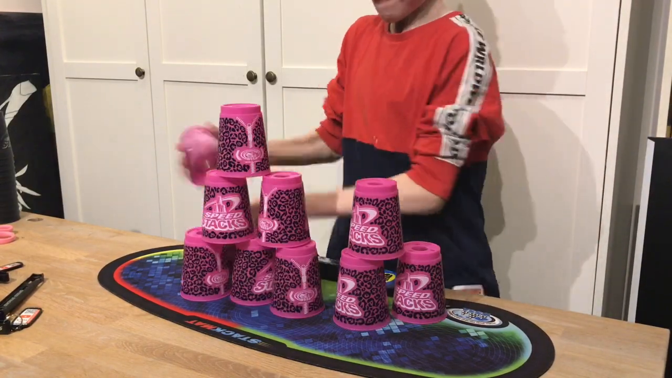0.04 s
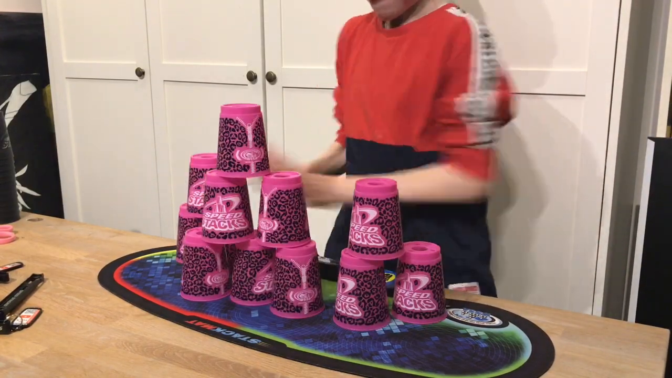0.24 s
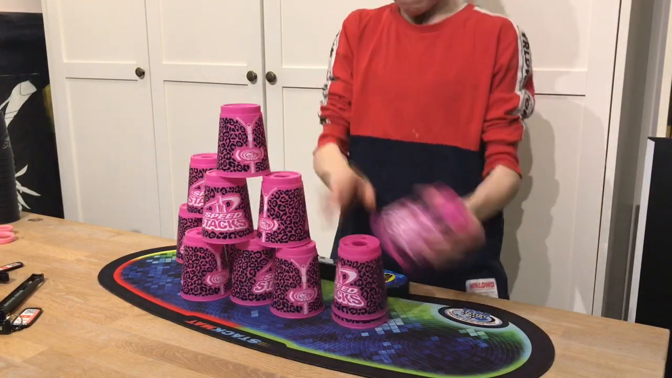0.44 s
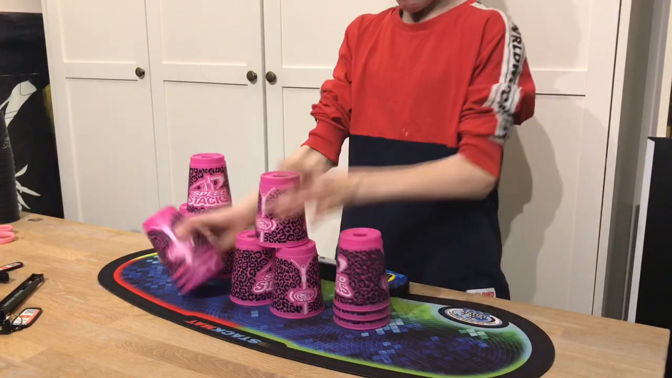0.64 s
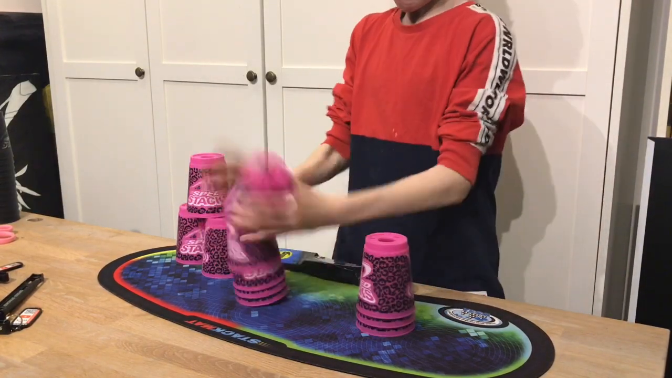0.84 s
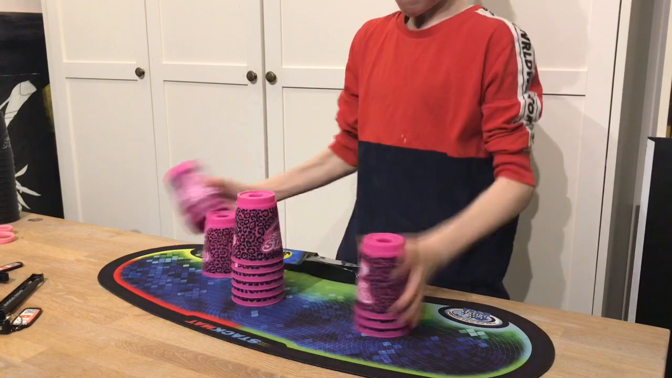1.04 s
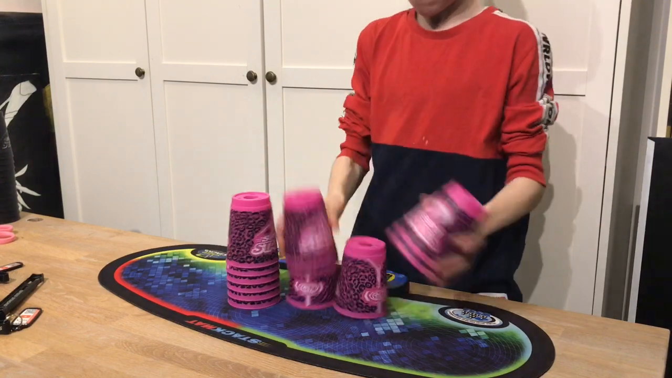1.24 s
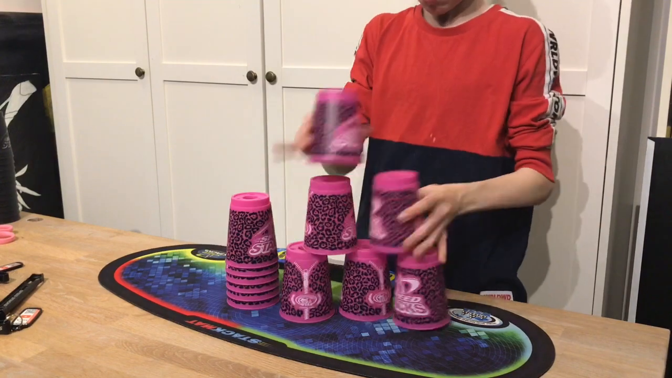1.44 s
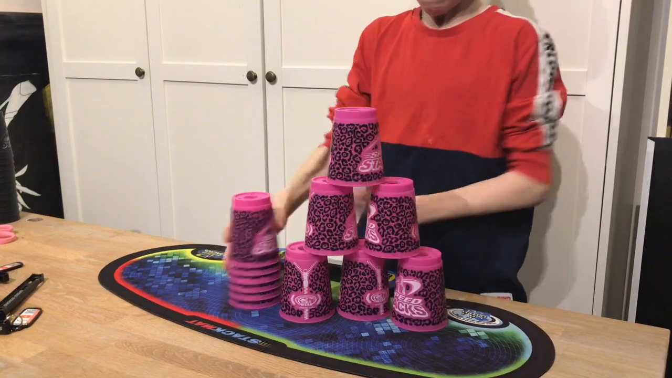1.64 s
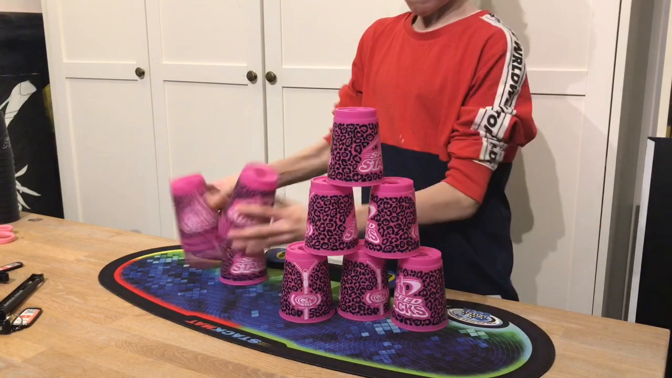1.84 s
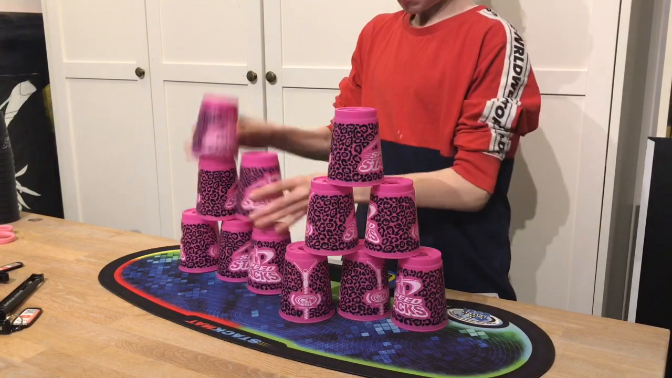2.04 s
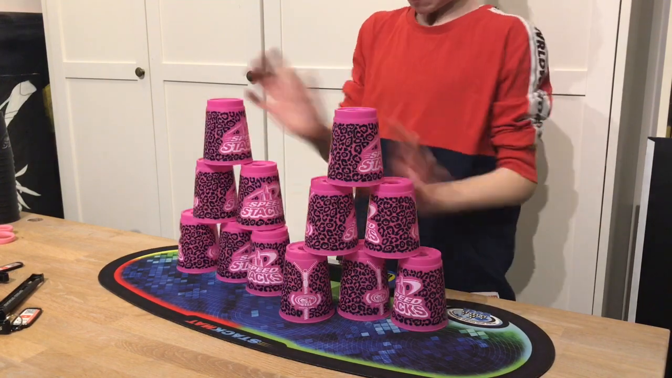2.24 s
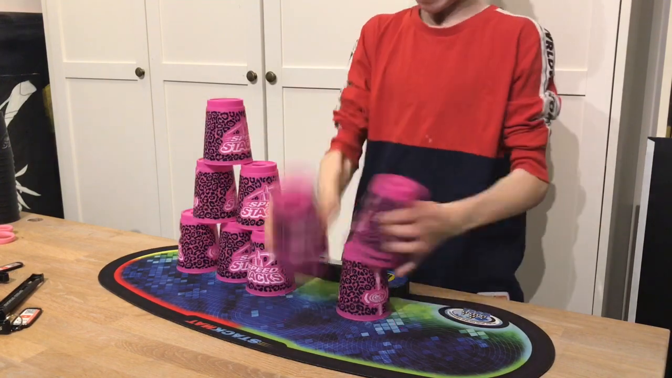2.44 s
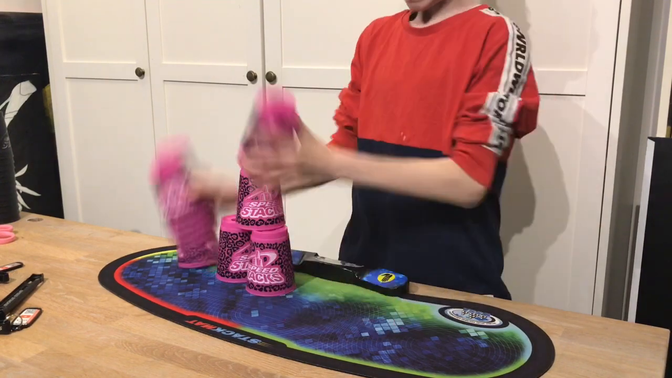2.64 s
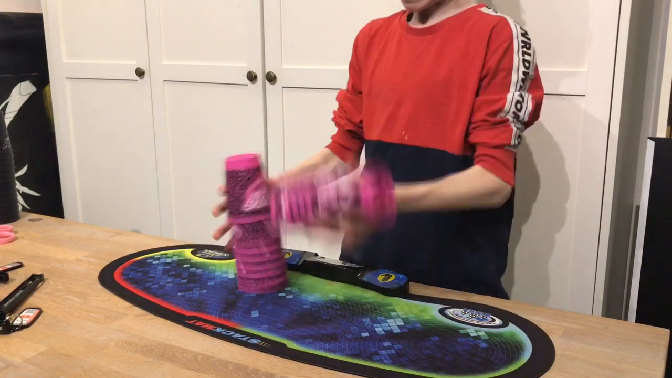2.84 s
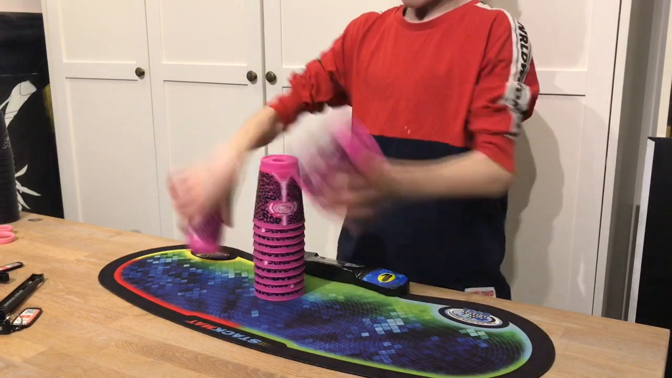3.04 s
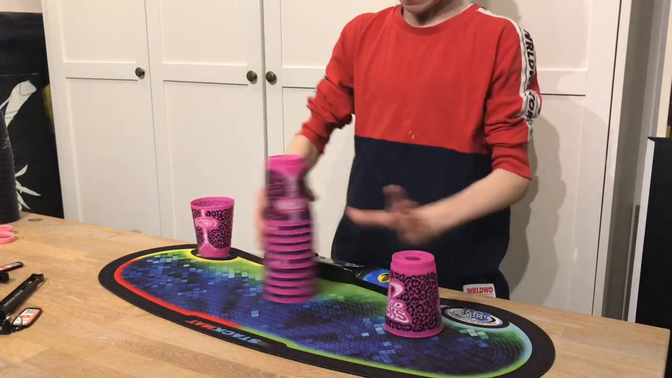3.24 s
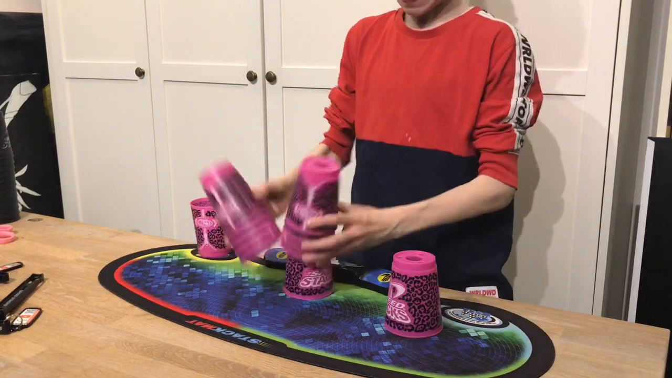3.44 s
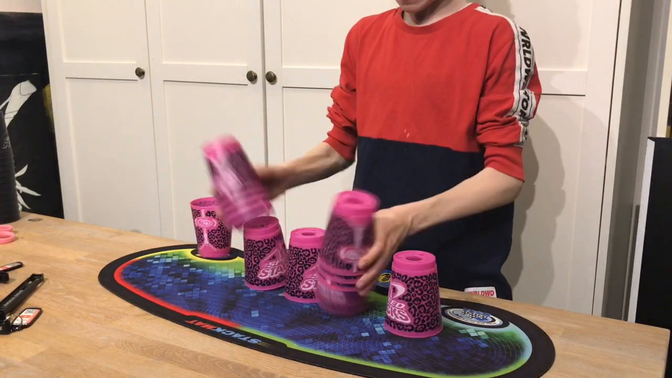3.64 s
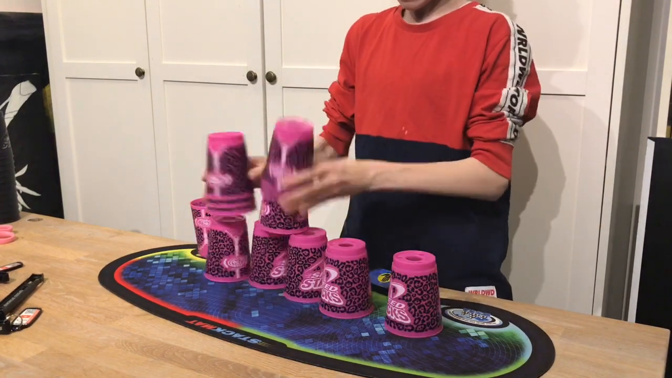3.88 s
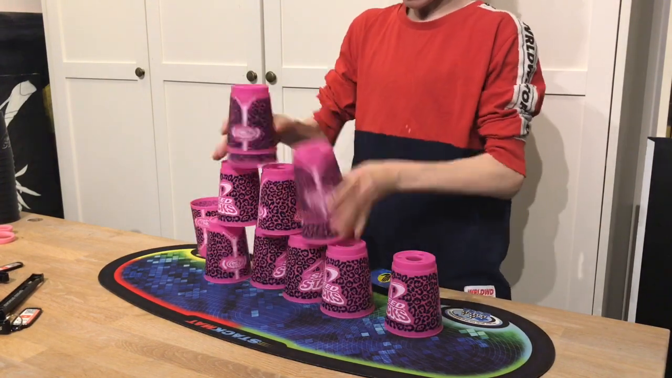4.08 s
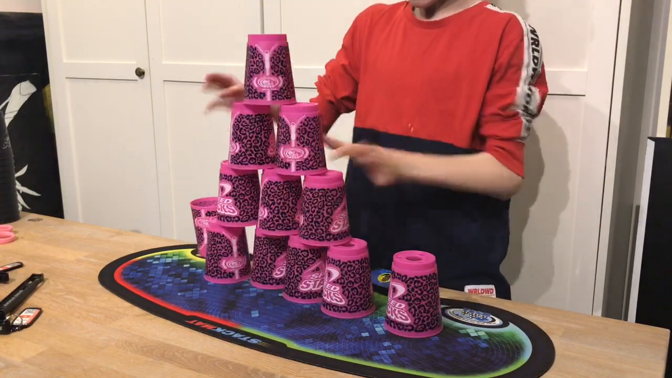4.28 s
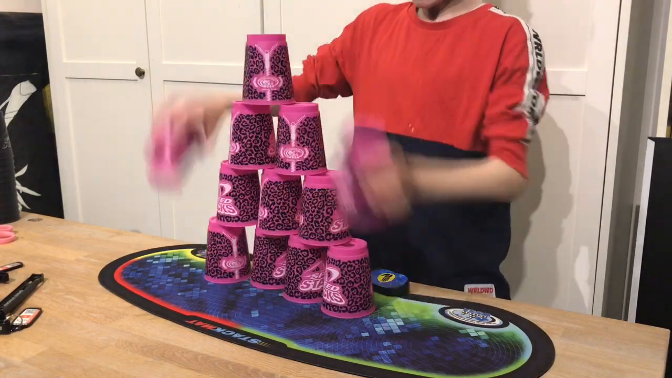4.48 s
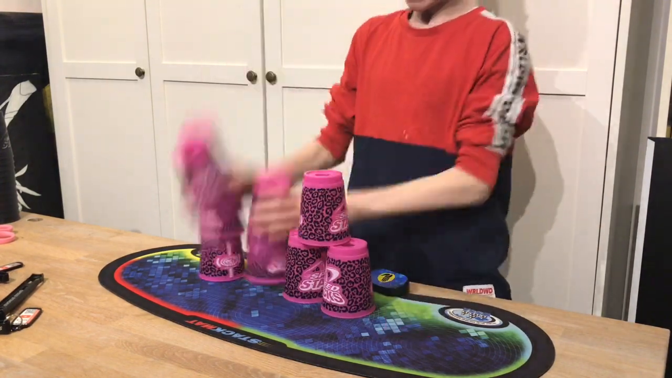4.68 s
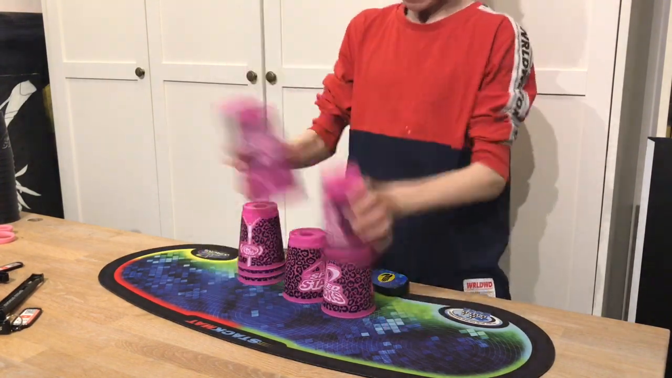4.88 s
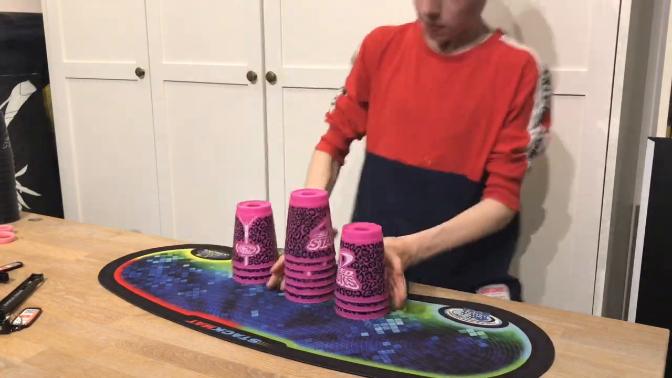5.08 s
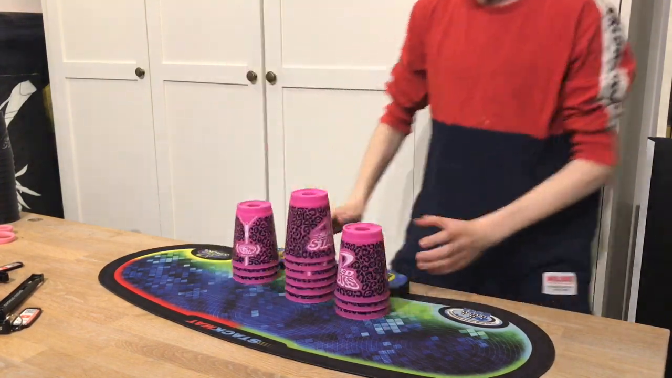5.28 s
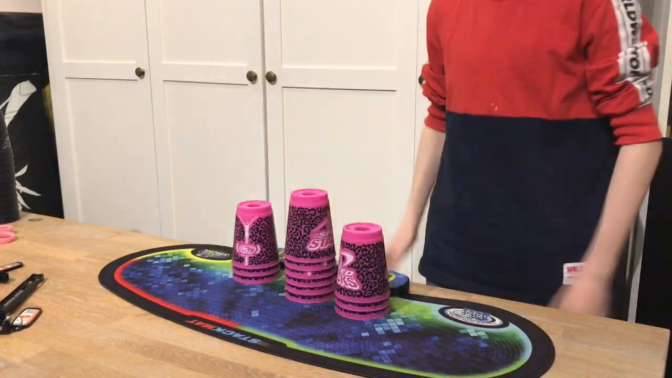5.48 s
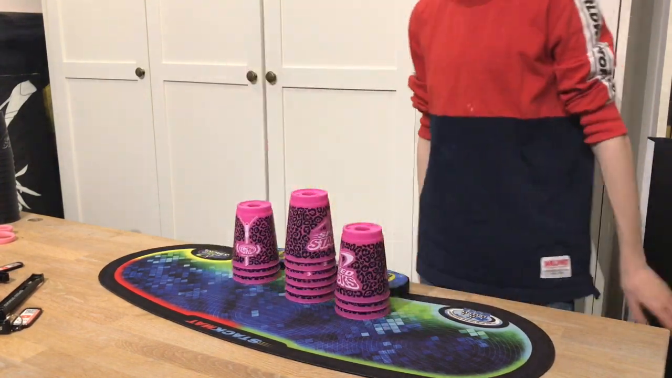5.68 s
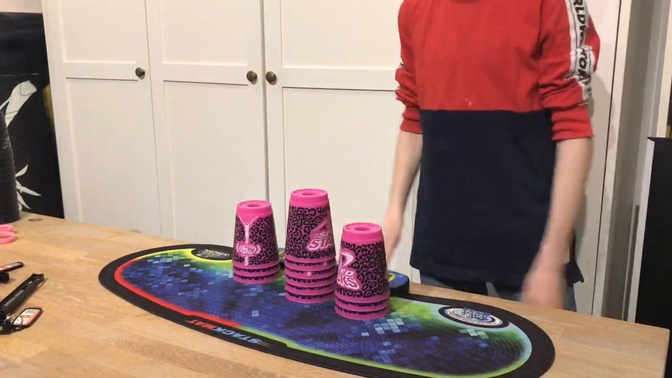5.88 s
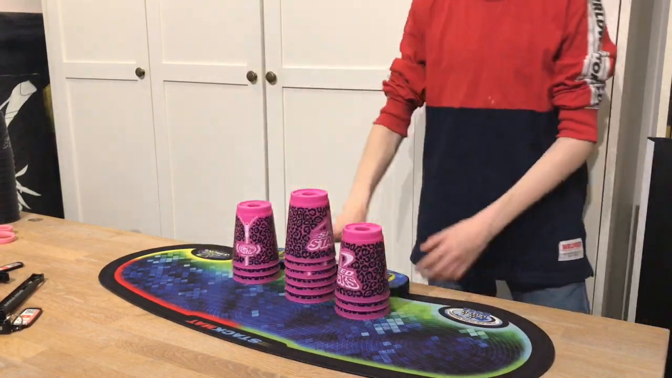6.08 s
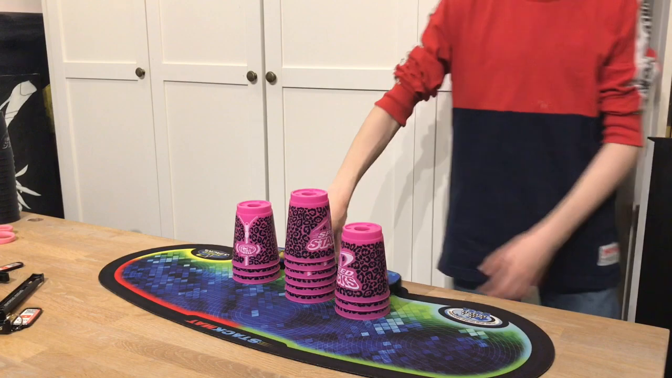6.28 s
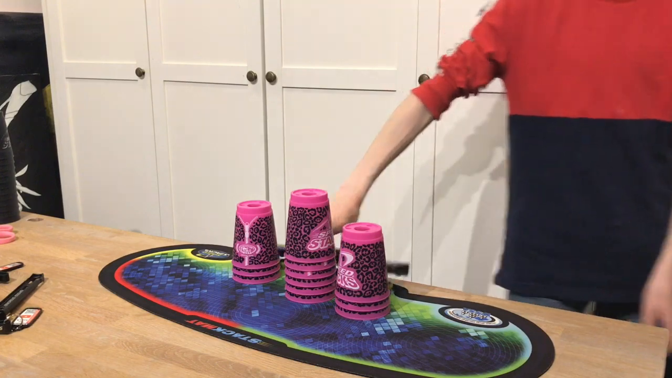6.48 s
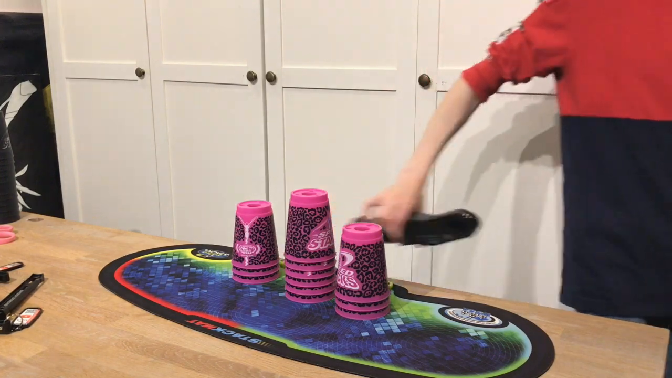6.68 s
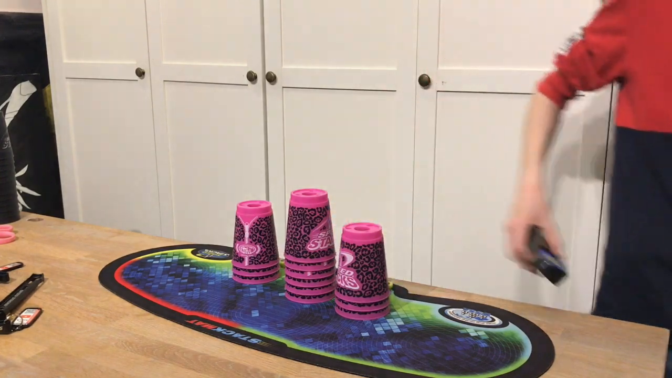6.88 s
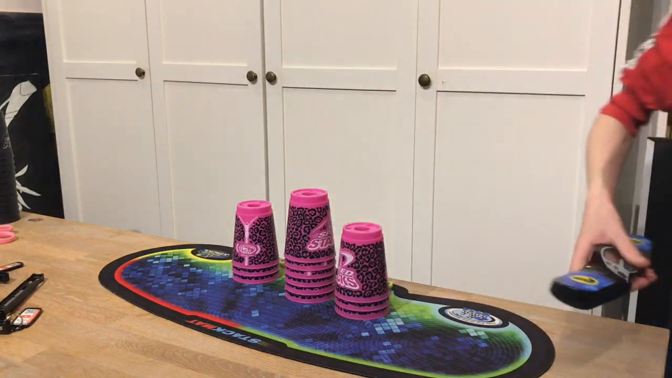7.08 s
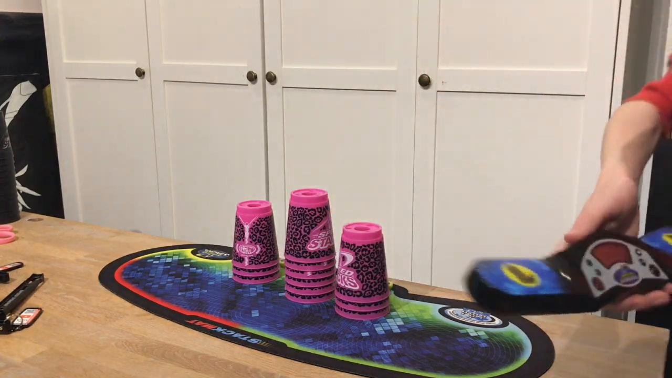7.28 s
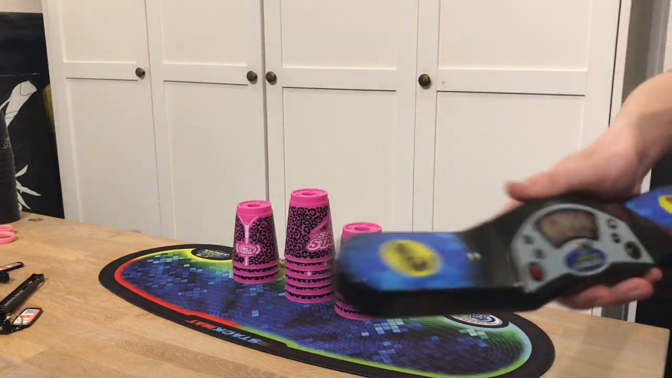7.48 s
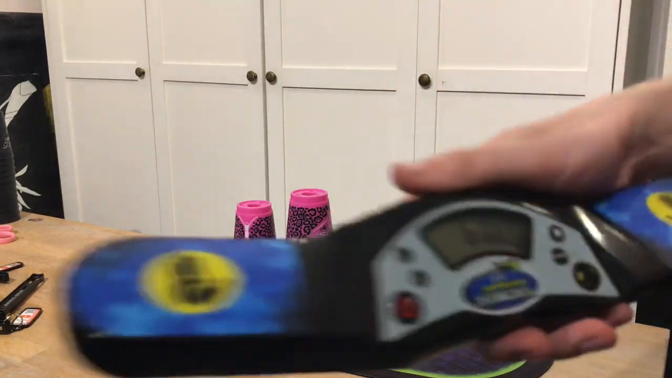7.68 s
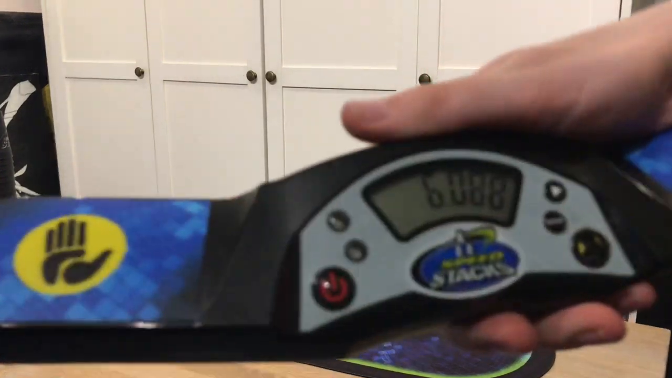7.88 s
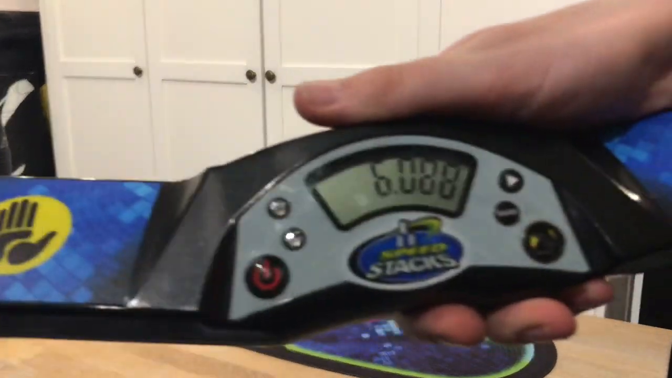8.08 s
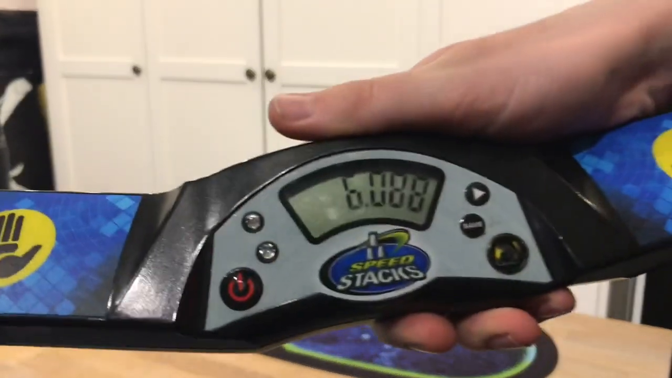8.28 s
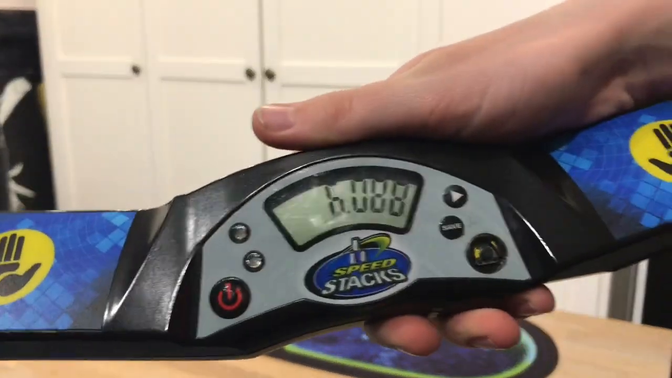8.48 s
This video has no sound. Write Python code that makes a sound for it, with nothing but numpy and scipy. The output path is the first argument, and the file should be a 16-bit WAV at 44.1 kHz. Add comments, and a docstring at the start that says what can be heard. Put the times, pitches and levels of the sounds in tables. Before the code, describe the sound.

Hollow plastic cups clatter in a frantic five-second run of pops, clicks and table thumps, then a small plastic box taps once sharply and quiet follows.

```python
"""Hollow plastic cups are stacked and unstacked fast on a thin mat over a wooden table, in a small room.
Rims crack as treble noise bursts, trapped air and cup walls ring as struck modes, the table thumps, and
nesting walls scrape as random stick-slip pulses. Then a small plastic box taps and scuffs as it is lifted
and handled, with soft steps; clothes rustle as swelling noise bands. Quiet room tone lies under it all."""
import sys
import numpy as np
from scipy import signal
from scipy.fft import rfft, irfft, next_fast_len
from scipy.io import wavfile

SR = 44100
rng = np.random.default_rng(int(sys.argv[2]) if len(sys.argv) > 2 else 0)


def unload_wav(signal):
    """Save mono or channel-first audio to the path in sys.argv[1] as 16-bit WAV at rate SR, clipped to [-1, 1]."""
    wavfile.write(
        sys.argv[1],
        SR,
        np.round(np.clip(np.atleast_2d(signal).T, -1, 1) * 32767).astype(np.int16),
    )


N = 375776

# Modes of the cup wall. Each row: frequency in Hz, relative level in dB, T60 in seconds.
CUP_MODES = [(658, -0.5, 0.064), (932, 0, 0.047), (1110.3, -4.5, 0.059), (1310, -7, 0.03),
             (1707, -10, 0.028), (2210, -10, 0.015), (3218, -9.5, 0.004)]
# Modes of the table. Each row: frequency in Hz, relative level in dB, T60 in seconds.
TABLE_MODES = [(94.86, -9, 0.083), (190, -3, 0.07), (270, -9, 0.061), (321, -0.5, 0.15), (460, 0.5, 0.049)]
SCATTER_DB = 3  # spread of cup mode levels from blow to blow


def undb(db):
    """Amplitude factor of a level in dB."""
    return 10 ** (np.asarray(db) / 20)


def band(x, lo_hz, hi_hz):
    """Butterworth bandpass."""
    edges_hz = [lo_hz, min(hi_hz, .45 * SR)]
    return signal.sosfilt(signal.butter(2, edges_hz, "bandpass", fs=SR, output="sos"), x)


def highpass(x, hz):
    """Butterworth highpass, 4th order."""
    return signal.sosfilt(signal.butter(4, hz, "highpass", fs=SR, output="sos"), x)


def unit(x):
    """Scale to RMS 1."""
    return x / np.sqrt(np.mean(x ** 2))


def unit_peak(x):
    """Scale to peak 1."""
    return x / np.abs(x).max()


def fall(t, t60):
    """Exponential decay, 60 dB down at t60."""
    return np.exp(-np.log(1000) * t / t60)


def add(out, s, sound):
    """Mix a sound into out from s seconds, cut at the end."""
    i = int(s * SR)
    out[i:i + len(sound)] += sound[:N - i]


def swells(table, rise_s, t60_s):
    """Each row (start s, length s, level dB) swells up to its start, holds for its length and dies away."""
    t = np.arange(N) / SR
    total = 0
    for s, length, db in table:
        rise = np.clip(1 + (t - s) / rise_s, 0, 1) ** 2
        total = total + undb(db) * rise * fall(np.maximum(t - s - length, 0), t60_s)
    return total


def near_pitch(modes, favoured_hz, db_per_oct=11.5):
    """The same modes, weaker the further they lie from the pitch a blow favours."""
    return [(hz, db - db_per_oct * abs(np.log2(hz / favoured_hz)), t60) for hz, db, t60 in modes]


def ring(modes, push_s, chatter_s, scatter_db=0, detune=0):
    """A blow and the chatter after it drive the modes, with random gains and pitches if asked. Peak 1."""
    blow_db = 10.5  # first contact, added to the chatter
    t = np.arange(SR // 6) / SR
    chance = rng.standard_normal((len(modes), 2))
    body = np.zeros(len(t))
    for (hz, db, t60), (a, b) in zip(modes, chance):
        tone = np.sin(2 * np.pi * hz * (1 + detune * b) * t)
        body += undb(db + scatter_db * a) * tone * fall(t, t60)
    chatter = rng.standard_normal(SR // 16) * fall(t[:SR // 16], chatter_s)
    chatter[0] += undb(blow_db)
    force = np.convolve(chatter, np.hanning(int(push_s * SR) + 3))  # a softer contact pushes longer
    return unit_peak(signal.fftconvolve(body, force))


def blur(lo_hz, hi_hz, t60_s):
    """Modes too dense to tell apart: a dying band of noise. Peak 1."""
    t = np.arange(SR // 5) / SR
    return unit_peak(band(rng.standard_normal(len(t)) * fall(t, t60_s), lo_hz, hi_hz))


def crack(top_db):
    """Hard edges meeting: a short burst in two treble bands, then tiny rebounds. Peak 1."""
    t = np.arange(SR // 10) / SR
    hits = rng.random(len(t)) < 300 / SR  # 300 rebounds per second
    rebounds = np.convolve(hits, fall(t[:SR // 100], .008))[:len(t)]
    envelope = fall(t, 0.0091) + undb(-11.5) * (0.18 + rebounds) * fall(t, 0.12)
    onset = np.clip(t / 0.00074, 0, 1)
    burst = rng.standard_normal(len(t)) * envelope * onset
    return unit_peak(band(burst, 1100, 7400) + undb(top_db) * band(burst, 4600, 13500))


def slips(rate, spread_db):
    """Stick-slip contacts at random moments, rate per second, a few much larger than the rest."""
    size_db = spread_db * np.minimum(rng.exponential(size=N), 3)
    return (rng.random(N) < rate / SR) * undb(size_db) * np.sign(rng.standard_normal(N))


def quiet():
    """Room tone and microphone hiss: steady noise shaped in frequency."""
    # Noise spectrum. Each row: frequency in Hz, relative level in dB per Hz.
    spectrum = [(24, -32), (40, -9), (101, 3.5), (126, -10), (197, -4), (472, -12.5), (949, -14.5),
                (15500, -31)]
    level_db = -64
    size = next_fast_len(N)
    hz, db = np.transpose(spectrum)
    bins_hz = np.arange(size // 2 + 1) * SR / size
    colour = undb(np.interp(np.log(bins_hz + 1), np.log(hz), db))
    noise = irfft(rfft(rng.standard_normal(size)) * colour, size)[:N]
    return undb(level_db) * unit(noise)


def rustles():
    """Clothes rub as the arms swing: broad noise that swells and fades."""
    # Rubs of cloth. Each row: start in seconds, length in seconds, level in dB.
    rubs = [(5.27, 0.25, -60), (7.17, .05, -66), (7.68, 0.05, -67), (8.41, .04, -70)]
    return swells(rubs, rise_s=0.098, t60_s=0.22) * unit(band(rng.standard_normal(N), 570, 8600))


def steps():
    """A foot set on the floor: a soft low noise pulse."""
    # Footfalls. Each row: start in seconds, level in dB.
    footfalls = [(6.154, -65.5), (7.601, -58.5)]
    out = np.zeros(N)
    t = np.arange(SR // 4) / SR
    pulse = t / .025 * np.exp(1 - t / .025)  # peaks after 25 ms
    for s, db in footfalls:
        add(out, s, undb(db) * unit(band(rng.standard_normal(len(t)), 110, 260)) * pulse)
    return out


def box_scuffs():
    """The box scuffs on mat and fingers: short swells of band noise."""
    # Scuffs. Each row: start in seconds, length in seconds, level in dB, centre in Hz.
    scuffs = [(6.301, 0.028, -54, 1350), (6.789, 0.062, -71.5, 1507), (8.018, 0.024, -70, 2290),
              (8.421, 0.018, -67, 2025)]
    out = np.zeros(N)
    for *row, hz in scuffs:
        noise = unit(band(rng.standard_normal(N), hz / 1.5, hz * 1.24))
        out += swells([row], rise_s=0.036, t60_s=0.065) * noise
    return out


def box_taps():
    """The box is knocked, lifted and handled: its modes ring over a crack and a loose rattle."""
    # Taps. Each row: start in seconds, level in dB, favoured pitch in Hz.
    taps = [(6.152, -51.5, 1610), (6.278, -48, 1420), (6.327, -16, 1340), (6.376, -31.5, 1920),
            (6.428, -38.5, 1306), (6.467, -35, 2290), (6.636, -45.5, 1420), (7.632, -50, 1000)]
    # Modes of the box. Each row: frequency in Hz, relative level in dB, T60 in seconds.
    box_modes = [(941, -1, 0.028), (1257, 4, 0.022), (1400, 14.5, 0.02), (1895, 4.5, 0.025),
                 (2187, -6.5, 0.011), (2707, -4, 0.013), (3304, -17, 0.01)]
    crack_db, rattle_db = -16.5, -12  # relative to the ring
    out = np.zeros(N)
    for s, db, hz in taps:
        rung = ring(near_pitch(box_modes, hz), push_s=.00012, chatter_s=0.03, detune=.02)
        add(out, s, undb(db) * highpass(rung, 630))
        add(out, s, undb(db + crack_db) * crack(top_db=-8))
        add(out, s, undb(db + rattle_db) * blur(0.59 * hz, 1.5 * hz, 0.1))
    return out


def shaken(rattle, modes, detune):
    """Slip pulses ring a set of modes. RMS 1."""
    response = ring(modes, push_s=.0001, chatter_s=0.00042, detune=detune)
    return unit(signal.oaconvolve(rattle, response)[:N])


def scrape():
    """Walls slide as cups nest or part: slips gate a treble crackle and rattle the cup wall and table."""
    # Slides. Each row: start in seconds, length in seconds, level in dB.
    slides = [(0.0, 0.31, -48), (0.619, 0.037, -27.5), (0.735, 0.12, -39), (0.924, 0.13, -33.5),
              (1.133, 0.046, -32.5), (1.256, 0.09, -46), (1.444, 0.52, -52), (1.895, 0.31, -45.5),
              (2.358, 0.024, -24.5), (2.583, 0.27, -34), (2.92, 0.29, -50), (3.294, 0.54, -51),
              (3.845, 0.52, -50.5), (4.626, 0.17, -33), (4.889, 0.14, -33)]
    tunings, table_db, cup_db = 5, -2.5, 5.0  # levels relative to the crackle
    t = np.arange(SR // 20) / SR
    gate = signal.fftconvolve(np.abs(slips(rate=310, spread_db=5.0)), fall(t, 0.022))[:N]
    hiss = gate * rng.standard_normal(N)
    hiss = band(hiss, 1400, 3900) + 0.45 * band(hiss, 4500, 11000)
    rattle = slips(rate=490, spread_db=3.5)
    shared = unit(hiss) + undb(table_db) * shaken(rattle, TABLE_MODES, detune=0)
    out = np.zeros(N)
    for k in range(tunings):  # every fifth slide shares one random detuning of the cup wall
        wall = shaken(rattle, CUP_MODES, detune=0.094)
        envelope = swells(slides[k::tunings], rise_s=0.01, t60_s=0.053)
        out += envelope * (shared + undb(cup_db) * wall)
    return out


def thumps():
    """Heavier landings, and last a blow near the loudest box tap, ring the table over a broad thud."""
    # Thumps. Each row: start in seconds, level in dB, favoured pitch in Hz.
    blows = [(0.154, -9, 329), (0.382, -10.5, 420), (0.667, -16.5, 153.7), (0.975, -19.5, 196),
             (1.521, -21, 252), (1.752, -23.5, 197.7), (2.535, -18, 249.7), (2.693, -8, 176),
             (2.882, -18.5, 183.8), (3.028, -23.5, 187.7), (3.103, -23, 331.4), (3.145, -14.5, 322.5),
             (3.695, -18, 325.4), (4.42, -17.5, 327.2), (4.723, -19, 206.6), (4.959, -15, 252.5),
             (4.99, -9.5, 213.5), (6.336, -44, 323)]
    thud_db, thud_t60_s = -5.5, .1
    out = np.zeros(N)
    for s, db, hz in blows:
        modes = near_pitch(TABLE_MODES, hz, db_per_oct=10.5)
        add(out, s, undb(db) * ring(modes, push_s=0.00083, chatter_s=0.0074, detune=0.01))
        add(out, s, undb(db + thud_db) * blur(.55 * hz, 2.4 * hz, thud_t60_s))
    return out


def knocks():
    """Each landing squeezes the air in the cup and bends its wall, most where the two agree in pitch."""
    # Landings. Each row: start in seconds, level in dB, pitch of the trapped air in Hz.
    landings = [(0.0587, -19, 940), (0.148, 6.5, 925), (0.1772, -9.5, 954), (0.3875, -8, 448),
                (0.452, -5, 601), (0.5654, -7.5, 1195), (0.5877, -9, 974), (0.6052, 0.5, 929),
                (0.621, -7, 1020), (0.6484, -4.5, 670), (0.6681, -1.5, 1680), (0.776, -3, 744),
                (0.9087, -10.5, 845), (0.984, -5.5, 673), (1.0085, -4.5, 995), (1.0823, -2, 678),
                (1.1092, -8.5, 666), (1.3577, -11, 743), (1.4, -7, 488), (1.5, -5, 660),
                (1.522, -0.5, 1185), (1.5283, -1.5, 563), (1.76, -14, 790), (1.8932, -4, 686),
                (2.0184, -15.5, 660), (2.0712, -7.5, 720), (2.104, -3, 548), (2.127, -2.5, 1127),
                (2.1377, 3, 1198), (2.2957, -8, 1070), (2.3373, -4.5, 870), (2.36, -8, 790),
                (2.3853, -7.5, 1020), (2.4029, -2, 610), (2.423, -8.5, 1570), (2.471, -5.5, 520),
                (2.482, -12, 487), (2.5339, 2, 1810), (2.6074, 0, 1056), (2.6292, 0.5, 1137),
                (2.6671, -6, 1430), (2.692, 0, 1164), (2.7556, -1.5, 1720), (2.7913, 3, 1374),
                (2.8836, -6, 916), (2.9049, -9, 927), (3.029, -11.5, 1110), (3.147, 4.5, 813),
                (3.3386, -16, 787), (3.5418, -19, 720), (3.616, -19, 674), (3.6965, -7, 674),
                (3.8084, -3, 667), (3.9074, 0.5, 738), (3.9576, -4, 625), (4.053, -15.5, 960),
                (4.0957, 2.5, 648), (4.1162, -3.5, 1010), (4.23, -5, 510), (4.251, 2, 1194),
                (4.412, -16.5, 900), (4.606, -1, 1030), (4.632, -2.5, 940), (4.6512, 5, 873),
                (4.7245, 4, 1420), (4.8767, -18.5, 827), (4.9086, -6.5, 1830), (4.955, 0.5, 724),
                (4.981, -7.5, 640)]
    air_db, wall_db = -4, -10
    body_db, body_t60_s = -10, 0.044  # the many small wall modes that blur into noise
    out = np.zeros(N)
    for s, db, air_hz in landings:
        start = s - .001
        air = [(air_hz, 0, 20 / air_hz),  # pop, T60 of 20 cycles
               (.98 * air_hz, -13, .075),  # fainter note that lingers
               (1.5 * air_hz, -12, 12 / air_hz)]  # overtone
        wall = ring(near_pitch(CUP_MODES, air_hz), push_s=.0002, chatter_s=0.047,
                    scatter_db=SCATTER_DB, detune=.04)
        add(out, start, undb(db + air_db) * ring(air, push_s=0.00031, chatter_s=0.0079))
        add(out, start, undb(db + body_db) * blur(0.28 * air_hz, 3 * air_hz, body_t60_s))
        add(out, start, undb(db + wall_db) * wall)
    return out


def clicks():
    """Each rim contact cracks and rings the upper modes of the cup wall."""
    # Rim contacts. Each row: start in seconds, level in dB, gain of the top treble band in dB.
    contacts = [(0.0594, -17, -6), (0.126, -18.5, -13), (0.175, -10, -33), (0.383, -32, 14),
                (0.408, -16, 3), (0.4299, -14, 12), (0.4515, -3.5, -15), (0.5348, -23.5, 24),
                (0.5648, -13.5, -8), (0.6025, -6, 22), (0.6317, -2.5, -22), (0.6687, -0.5, -19),
                (0.7227, -17, 10), (0.745, -12.5, 23), (0.7768, -2.5, -7), (0.853, -16, -5),
                (0.8688, -4, -26), (0.9913, -7.5, 10), (1.0088, -8.5, -15), (1.0821, -10.5, -11),
                (1.1632, -6.5, -46.5), (1.2653, -22.5, -26), (1.3624, -16, -4.5), (1.3972, -14.5, -29),
                (1.4944, -18, -18.5), (1.5256, -5, -18), (1.7618, -29, -27), (1.8967, -9.5, -12),
                (1.9178, -18, -20), (2.022, -20, 4.5), (2.068, -17.5, -26), (2.1023, -21, -22.5),
                (2.129, -16.5, 27.5), (2.1351, -7.5, -34), (2.3195, -9.5, -8.5), (2.337, -5.5, -9),
                (2.359, -5, -24), (2.3911, -1.5, -12), (2.4257, -6, -16), (2.479, -11.5, -10),
                (2.508, -17, 10), (2.532, -7.5, -24), (2.606, -11.5, 14), (2.6254, -8, 7), (2.648, -2, -20),
                (2.6687, -8, 1), (2.6905, -0.5, -26), (2.7571, -8, -7), (2.7887, -13.5, -3),
                (2.833, -15, 12), (2.885, -9, -10.5), (2.903, -18.5, -35), (2.967, -19, -6),
                (3.0236, -11.5, -7), (3.147, -30, -35), (3.337, -15.5, -3), (3.4225, -26.5, -21),
                (3.5463, -17, -39), (3.614, -21, -12), (3.7003, -11.5, -14), (3.8149, -15.5, -4),
                (3.9048, -11, -40.5), (3.957, -21, -18), (4.025, -28, -19), (4.054, -34, -16),
                (4.0942, -15.5, -10), (4.1182, -27, -7), (4.18, -19.5, -21), (4.2294, -12.5, -11),
                (4.2532, -12, -5), (4.259, -22, -1), (4.5991, -10.5, -14), (4.622, -9.5, -11),
                (4.632, -4.5, 16), (4.6512, 6.5, -18), (4.6818, -2, -10.5), (4.7232, -4.5, -6),
                (4.7427, 0.5, -15), (4.874, -13.5, -9), (4.9087, -6, -13), (4.9549, -1.5, -23),
                (4.985, -5, -7), ]
    ring_db = -7  # relative to the crack
    out = np.zeros(N)
    for s, db, top_db in contacts:
        wall = ring(CUP_MODES[3:], push_s=.0001, chatter_s=0.089, scatter_db=SCATTER_DB, detune=0.082)
        add(out, s - .0004, undb(db) * crack(top_db))
        add(out, s, undb(db + ring_db) * wall)
    return out


def room(x):
    """Direct sound plus a diffuse tail, faster dying in the treble, new for each of 16 spans of time."""
    # Reverberation of the room. Each row: frequency in Hz, T60 in seconds.
    decay = [(100, 0.52), (700, 0.38), (2000, 0.24), (5000, 0.24), (13000, 0.12)]
    tail_db, spans = -9, 16
    t = np.arange(SR // 2) / SR
    hz, t60 = np.transpose(decay)
    tails = 0
    for f in 50 * np.sqrt(2) ** np.arange(17):  # half-octave bands
        noise = band(rng.standard_normal((spans, len(t))), f, f * np.sqrt(2))
        tails = tails + noise * fall(t, np.interp(np.log(f), np.log(hz), t60))
    tails = tails * np.clip((t - .002) / 0.015, 0, 1)  # the first echoes need time to arrive
    out, step = x.copy(), N // spans + 1
    for k, tail in enumerate(tails):
        tail = tail / np.sqrt(np.sum(tail ** 2))
        echo = signal.fftconvolve(x[k * step:(k + 1) * step], tail)
        add(out, k * step / SR, undb(tail_db) * echo)
    return out


def scene():
    """All sources in the room, over its quiet."""
    handling = rustles() + steps() + box_scuffs() + box_taps()
    cups = highpass(knocks() + clicks(), 230)  # small things radiate no bass
    near = highpass(handling + scrape() + thumps() + cups, 75)
    return (room(near) + quiet())[None]


def record(dry):
    """A phone rounds the loudest peaks, drops the deep bass and cuts the top."""
    top_hz = 15720
    x = dry / (1 + np.abs(dry) ** 6) ** (1 / 6)
    x = signal.sosfilt(signal.butter(1, 30, "highpass", fs=SR, output="sos"), x)
    return signal.sosfilt(signal.ellip(10, .2, 70, top_hz, fs=SR, output="sos"), x)


dry = scene()
out = record(dry)
unload_wav(out)
```